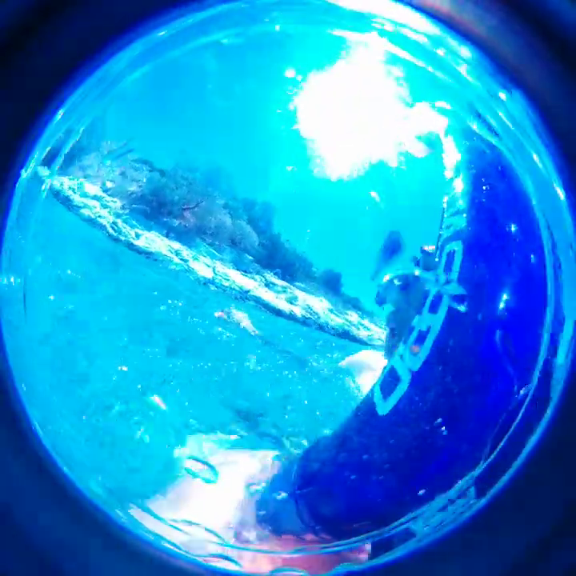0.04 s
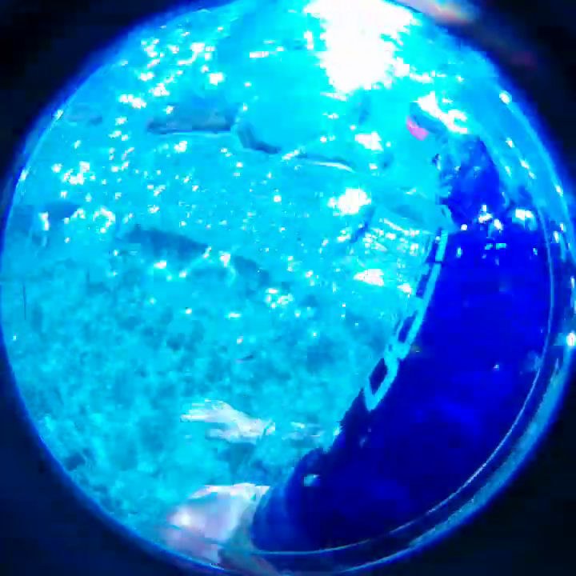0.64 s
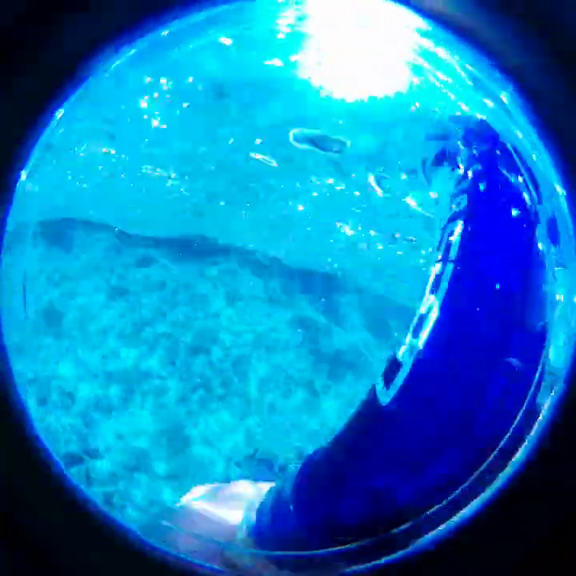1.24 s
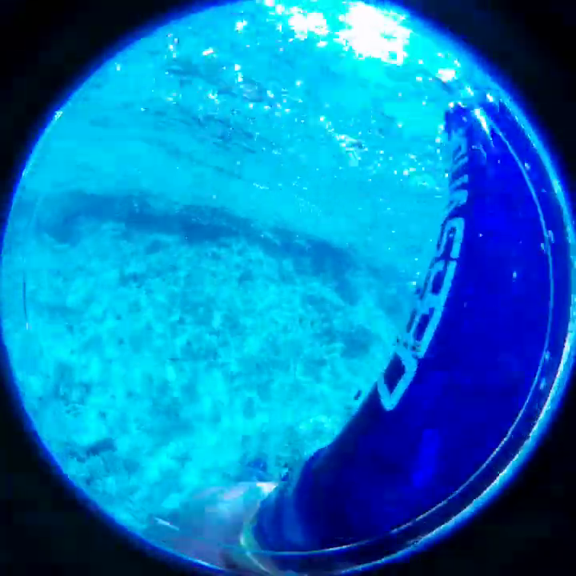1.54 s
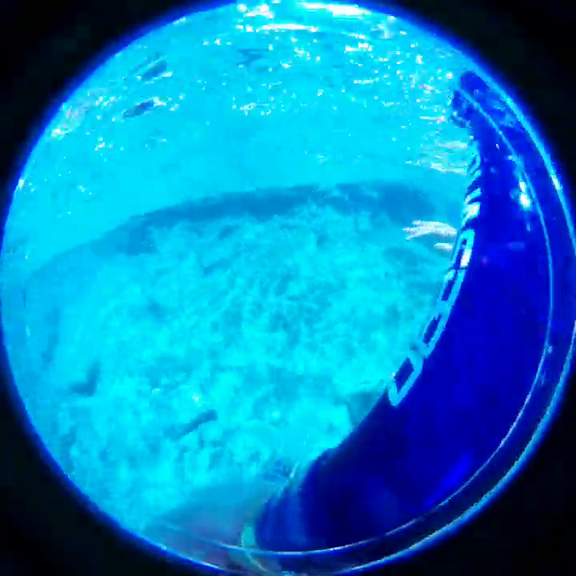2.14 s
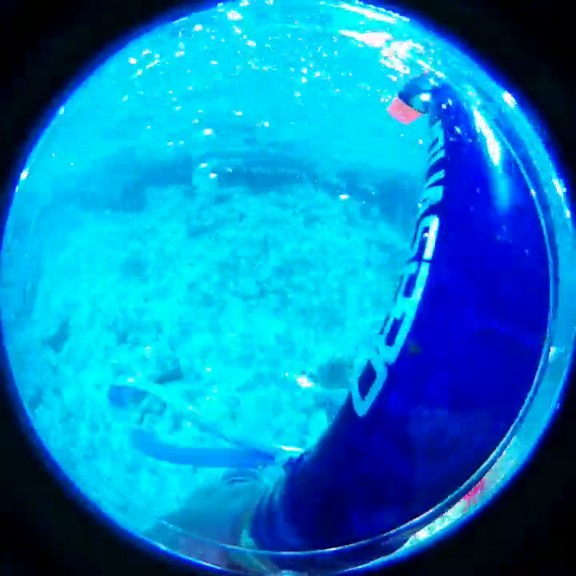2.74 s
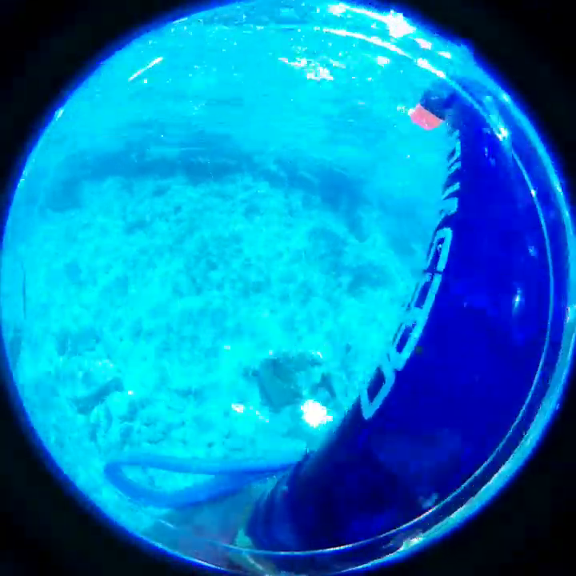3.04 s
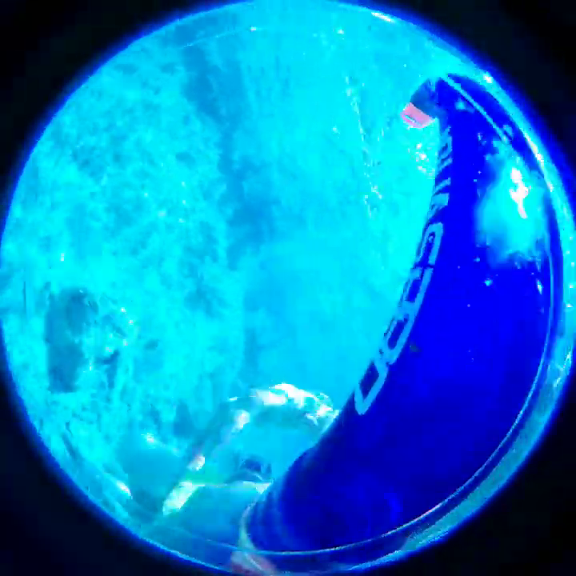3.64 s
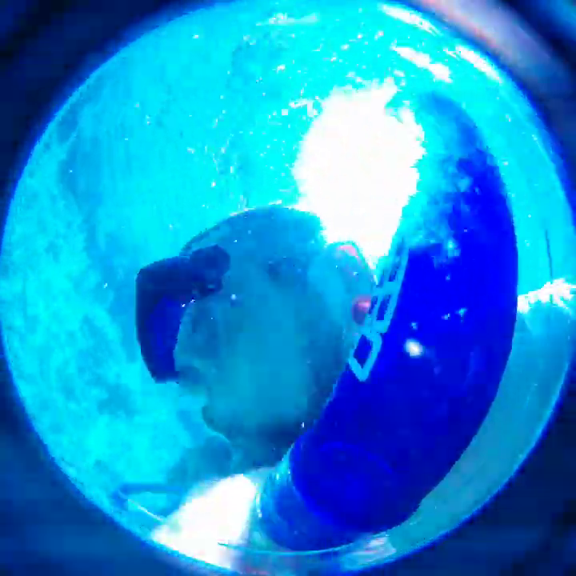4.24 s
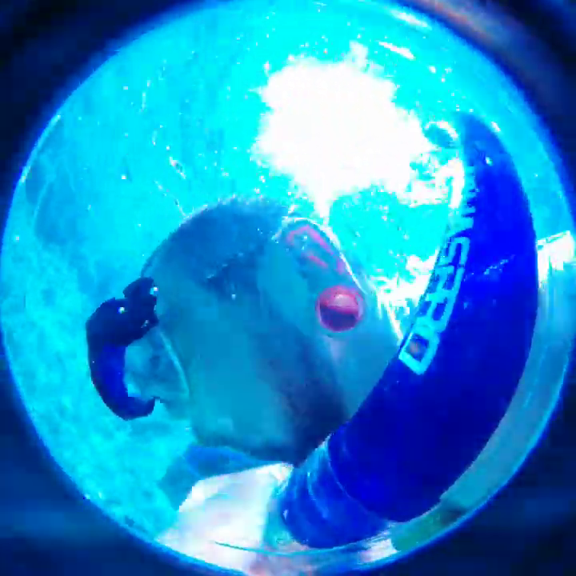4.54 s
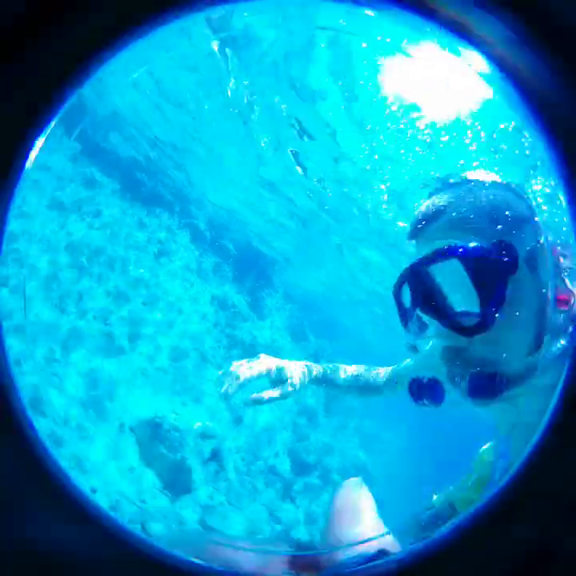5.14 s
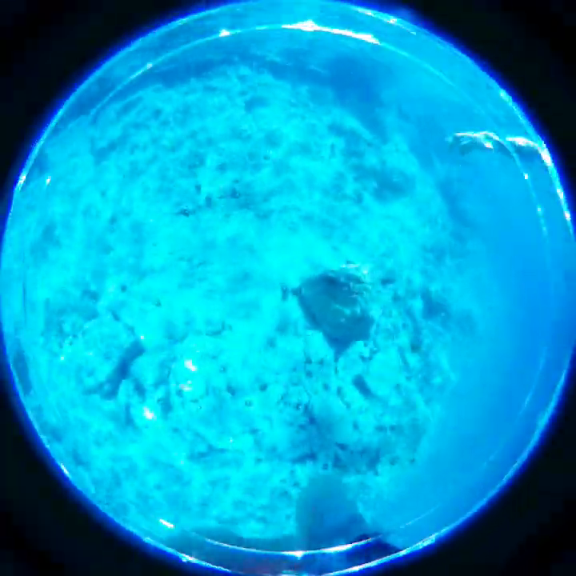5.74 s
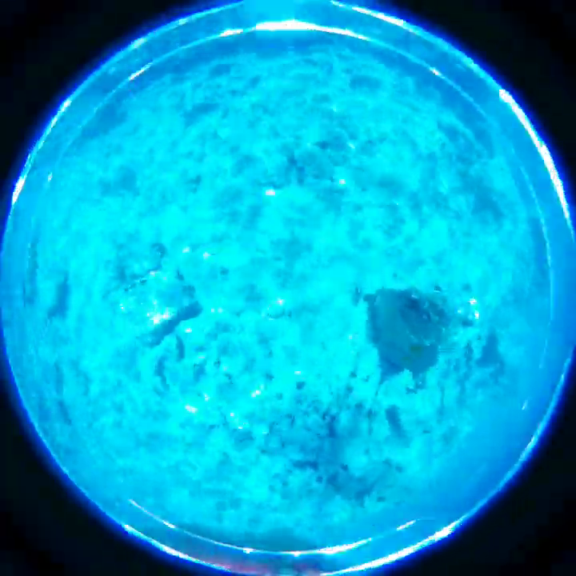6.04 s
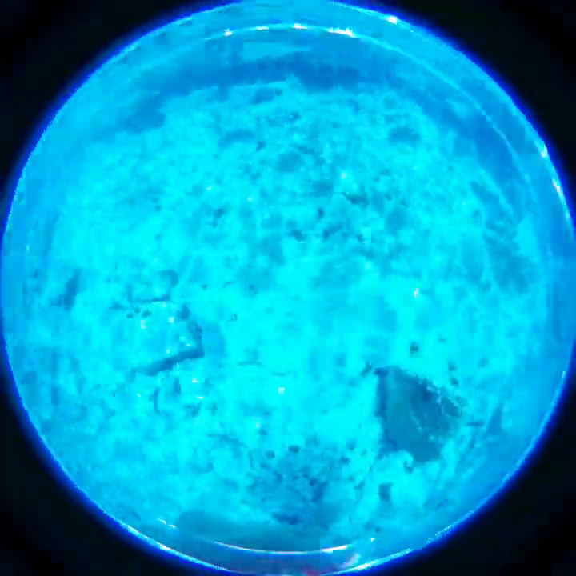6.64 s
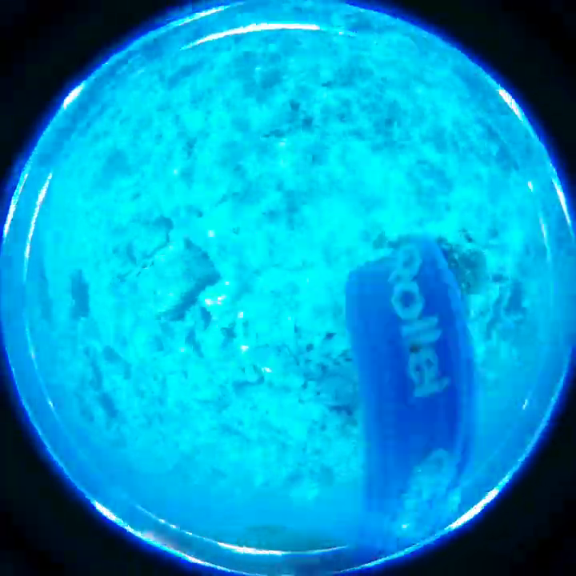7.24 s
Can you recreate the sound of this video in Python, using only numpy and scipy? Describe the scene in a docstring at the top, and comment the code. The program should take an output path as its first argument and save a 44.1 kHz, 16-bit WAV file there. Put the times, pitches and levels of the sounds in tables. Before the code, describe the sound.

Waves wash over a waterproof case with bubbly pops and dull thumps, before it dips under with a gulp and fading bubbling.

```python
"""At the sea surface, heard from inside a waterproof case that a snorkeller carries along, then dips under.
Waves wash over the case and slap it; trapped air rings as bubbles, thumps in pockets and bursts in spits,
over a bed of murmur and fizz. The plunge drags down a large air cavity that gulps, booms and breaks
into a churning cloud. The case shuts out the treble. At the peak of the plunge comes a sharp,
bright double click, like a brief overload."""
import sys
import numpy as np
from scipy import signal
from scipy.fft import rfft, irfft, next_fast_len
from scipy.io import wavfile
from scipy.ndimage import uniform_filter1d, minimum_filter1d, map_coordinates

SR = 44100
rng = np.random.default_rng(int(sys.argv[2]) if len(sys.argv) > 2 else 0)


def persist_wave(psi):
    """Save psi, clipped to +-1, as 16-bit WAV."""
    counts = np.round(np.clip(psi, -1, 1) * 32767).astype(np.int16)
    wavfile.write(sys.argv[1], SR, np.atleast_2d(counts).T)


N = 322371
T = np.arange(N) / SR
PLUNGE_S = 5.199  # the case is pulled under
PINCH_S = PLUNGE_S + 0.036  # the air cavity pinches off

# EQ curves for fine fizz, a dull knock on the case and bright spray: f/Hz, gain/dB
FIZZ_EQ = [(900, -24), (1700, 1), (2400, 4), (2850, -4.5), (3350, -1.5), (4200, -28)]
KNOCK_EQ = [(60, -7), (250, 12.5), (650, 4.5), (1200, -2), (1600, -16), (3500, -27), (5000, -72.5)]
SPRAY_EQ = [(300, -14), (1000, -1), (1900, 3.5), (2600, -1), (3300, -8), (3800, -3.5), (4600, -29)]


def amp(db):
    """Decibels to gain."""
    return 10 ** (np.asarray(db) / 20)


def unit(x):
    """Scale to rms 1."""
    return x / np.sqrt(np.mean(x ** 2) + 1e-20)


def at_peak(x, db):
    """Scale to a peak level."""
    return amp(db) * x / np.abs(x).max()


def add(track, s, sound):
    """Mix a sound into the track at s seconds."""
    part = track[max(round(s * SR), 0):][:len(sound)]
    part += sound[:len(part)]


def during(start, end, fade):
    """Gate: 1 inside a span, fading to 0 outside."""
    return np.clip(1 + np.minimum(T - start, end - T) / fade, 0, 1)


def swell(crest, db, rise, fall, hold=0):
    """Envelope that climbs to a crest, holds and falls away; rise and fall in dB/s."""
    return amp(db - rise * np.maximum(crest - T, 0) - fall * np.maximum(T - crest - hold, 0))


def after_plunge(db, fall):
    """Envelope that jumps up at the plunge and fades by fall dB/s."""
    return swell(PLUNGE_S, db, 4000, fall)


def together(gains):
    """Joint gain of unrelated sounds: their powers add."""
    return np.sqrt(sum(g ** 2 for g in gains))


def wobble(rate):
    """A smooth random curve, rate knots a second."""
    return map_coordinates(rng.standard_normal(int(N * rate / SR) + 4), [T * rate])


def eq(x, points):
    """Minimum-phase filter through points of f/Hz, gain/dB."""
    size = 2 * next_fast_len(len(x) // 2 + 2048)
    hz, db = np.transpose(points)
    gain = amp(np.interp(np.log(np.fft.rfftfreq(size, 1 / SR) + 1), np.log(hz), db))
    cepstrum = irfft(np.log(gain))
    cepstrum[1:size // 2] *= 2
    cepstrum[size // 2 + 1:] = 0
    return irfft(rfft(x, size) * np.exp(rfft(cepstrum)), size)[:len(x)]


def burst(t, t60):
    """White noise that dies by 60 dB in t60 seconds."""
    return rng.standard_normal(len(t)) * amp(-60 * t / t60)


def ring(t, hz, t60, rise=0):
    """A pulsating bubble: it starts within a cycle and drifts by rise * hz a second near the surface."""
    phase = 2 * np.pi * hz * t * (1 + rise * t / 2)
    return -np.sin(phase) * amp(-60 * t / t60) * (1 - np.exp(-2 * hz * t))


def cluster(count, hz, scatter, spacing, t60):
    """A few bubbles in quick succession, each weaker than the last; rms 1."""
    out, t = np.zeros(SR // 8), T[:SR // 8]
    for k, (detune, delay) in enumerate(rng.uniform(-0.82, 1, (count, 2))):
        pitch = hz * np.exp(scatter * detune * min(k + 1, 3))
        add(out, k * spacing * (1 + delay / 2), amp(-2.6 * k) * ring(t, pitch, t60, rise=1.6))
    return unit(out)


def swarm(start, end, colour, rate, band_hz, cycles, spread_db, noise_db):
    """Bubbles of random size, rate a second, in loud and soft clumps over noise; rms 1 in the span."""
    low_hz, high_hz = band_hz
    span = during(start, end, fade=0.006)
    pitch, length, strength, onset = np.hsplit(rng.random((int(rate * (end - start)), 4)), 4)
    hz = low_hz * (high_hz / low_hz) ** pitch
    life = cycles / hz * (0.5 + length)
    birth = np.minimum((start + (end - start) * onset) * SR, N - 1).astype(int)
    clump_db = 1.8 * wobble(35)[birth]
    gain = amp(clump_db - spread_db * np.log(np.maximum(strength, 0.04))) * hz / high_hz
    age = np.arange(int(cycles / low_hz * SR))
    rings = gain * ring(age / SR, hz, life, rise=0.23 / life)
    grains = np.bincount((birth + age).ravel(), rings.ravel(), N)[:N]
    mix = unit(grains) + amp(noise_db) * unit(span * rng.standard_normal(N))
    return unit(eq(mix, colour)) * np.sqrt(span.mean())


def patchy(x, depth_db):
    """Brief resonances come and go as the water changes shape."""
    spectrum = signal.stft(x, nperseg=512)[2]
    field = uniform_filter1d(rng.standard_normal(spectrum.shape), size=3, axis=0)
    field = unit(uniform_filter1d(field, size=7, axis=1))
    return signal.istft(spectrum * amp(depth_db * (field - 0.08 * depth_db)), nperseg=512)[1][:N]


def scattered(x):
    """The surface and nearby bubbles throw back a very short diffuse tail."""
    t = T[:SR // 10]
    tail = burst(t, t60=0.048) * (1 - np.exp(-t / 0.026))
    return x + amp(-11.5) * signal.fftconvolve(x, tail / np.linalg.norm(tail))[:N]


def hollowed(x):
    """The case walls cancel narrow bands of the underwater sound."""
    # notches: f/Hz, width/Hz, depth/dB
    notches = [(1046, 42, 11.5), (1620, 150, 1), (2170, 180, 7), (2640, 74, 2.5)]
    hz = np.arange(1, 4000, 10)
    cut_db = sum(db * np.exp(-((hz - centre) / width) ** 2) for centre, width, db in notches)
    return eq(x, np.c_[hz, -cut_db])


def sway():
    """Slow pressure on the moving case makes a wavering sub rumble."""
    # rumble EQ: f/Hz, gain/dB
    rumble_eq = [(10, 2), (22, -1.5), (50, -8), (90, -19.5), (200, -28), (400, -53)]
    # fader ride: t/s, relative level/dB
    ride = [(0.0, -39.5), (0.2, -41.5), (0.83, -49.5), (3.5, -37.5), (3.73, -35), (4.48, -43), (4.8, -32.5),
            (5.05, -37), (7.25, -37.5)]
    rumble = unit(eq(rng.standard_normal(N), rumble_eq))
    return rumble * amp(np.interp(T, *np.transpose(ride)) + 2 + 0.92 * wobble(28))


def sea():
    """A bed of far bubbles murmuring and fizzing; swirls and the plunge stir it up."""
    # murmur EQ: f/Hz, gain/dB
    murmur_eq = [(90, -5.5), (250, 4), (450, 0), (700, 1), (1020, -1), (1160, 0), (1550, -19), (2200, -28),
                 (3500, -49.5)]
    # swirls of bubbly water passing the case: t/s, murmur level/dB, fizz level/dB
    swirls = [(3.161, -34.5, -53.5), (3.64, -38.5, -59), (3.85, -47, -60.5), (4.919, -40.5, -54),
              (5.111, -36, -68.5), (5.879, -30.5, -65), (6.131, -34.5, -47), (7.249, -30.5, -42.5)]
    calm_murmur, calm_fizz = amp(-49.5), amp(-61.5)
    murmur_swells = [swell(s, db, rise=145.5, fall=135.5) for s, db, _ in swirls]
    fizz_swells = [swell(s, db, rise=145.5, fall=135.5) for s, _, db in swirls]
    # the finest bubbles linger after the plunge
    murmur_gain = together([calm_murmur, after_plunge(-31, fall=7.5)] + murmur_swells)
    fizz_gain = together([calm_fizz, after_plunge(-51, fall=7.5)] + fizz_swells)
    # stray plips give way to an even rush once the water is full of air
    stray = swarm(0, PLUNGE_S, murmur_eq, 300, (450, 1300), cycles=22, spread_db=3, noise_db=1)
    dense = swarm(PLUNGE_S, T[-1], murmur_eq, 1200, (400, 1500), cycles=26, spread_db=2.5, noise_db=4)
    fizz = swarm(0, T[-1], FIZZ_EQ, 250, (1600, 3800), cycles=30, spread_db=1.5, noise_db=10)
    return murmur_gain * (stray + dense) + fizz_gain * fizz


def gurgles():
    """Soft, separate strings of bubbles a little way off."""
    # gurgle cues: t/s, peak level/dB, f/Hz
    cues = [(2.848, -27.5, 1020), (3.27, -30, 987), (3.458, -28.5, 880), (3.49, -31.5, 605),
            (3.508, -25, 633), (4.118, -32.5, 965), (4.198, -28.5, 964), (4.335, -32, 690),
            (4.577, -34, 673), (6.14, -23, 740)]
    out = np.zeros(N)
    for s, db, hz in cues:
        add(out, s, at_peak(cluster(3, hz, scatter=0.11, spacing=0.004, t60=0.018), db))
    return out


def wash():
    """At the surface a fizzing sheet of water runs over the case; its resonances sink as it drains."""
    # EQ of the sheet: f/Hz, gain/dB
    sheet_eq = [(60, -4), (120, -1), (240, -13), (420, 6), (540, -5.5), (760, 1.5), (930, -10), (1060, 3),
                (1270, -6.5), (1600, -6.5), (1860, -4), (2000, -13.5), (2330, -5), (2780, -13),
                (3280, -11.5), (3650, -20.5), (4400, -29.5)]
    # waves over the case: crest t/s, hold/s, level/dB
    waves = [(0.02, 0.077, -31), (0.263, 0.083, -30), (0.489, 0.15, -33), (0.809, 0.028, -45.5),
             (0.933, 0.041, -42.5), (1.154, 0.011, -31), (2.018, 0.19, -30.5), (2.571, 0.016, -39.5)]
    drain_start_s, drain_end_s, wash_end_s = 1.92, 2.33, 2.72
    ripple = amp(1.4 * wobble(25) + 1.2 * wobble(110))
    flow = ripple * together(swell(s, db, rise=69.5, fall=56, hold=hold) for s, hold, db in waves)
    sheet = swarm(0, wash_end_s, sheet_eq, 1800, (700, 4000), cycles=24, spread_db=2.5, noise_db=4)
    # a thin film drains off: two noise bands ride one falling glide
    glide_hz = 998 + (1930 - 998) * np.exp(-np.maximum(T - drain_start_s, 0) / 0.083)
    phase = 2 * np.pi * np.cumsum(glide_hz) / SR
    low, high = [wobble(width_hz) * np.sin(ratio * phase) + wobble(width_hz) * np.cos(ratio * phase)
                 for ratio, width_hz in [(0.93, 340), (1.4, 900)]]
    film = unit(low + amp(-3) * high)
    draining = 0.76 * during(drain_start_s, drain_end_s, fade=0.047)
    # as the sheet thins, its smallest bubbles ring on
    foam = swarm(0.7, 1.09, FIZZ_EQ, 400, (2100, 2700), cycles=50, spread_db=1.5, noise_db=-6)
    return flow * ((1 - 0.64 * draining) * patchy(sheet, depth_db=4) + draining * film + amp(1) * foam)


def spits():
    """Tiny bubbles burst on the case, each a dry snap and a very short ring."""
    # spit cues: t/s, peak level/dB, f/Hz
    cues = [(0.2586, -18.5, 3300), (0.2807, -17.5, 3420), (0.355, -16.5, 1235), (0.4225, -9.5, 1073),
            (0.4238, -7.5, 3340), (0.4289, -7, 2030), (0.5162, -17.5, 1460), (1.0934, -6, 927),
            (1.107, -7, 3300), (1.132, -12.5, 3250), (1.154, -17.5, 3370), (1.164, -14.5, 1230),
            (1.202, -10.5, 3250), (1.274, -11, 3510), (1.32, -20.5, 766), (1.3239, -10, 3350),
            (1.4394, -12.5, 3420), (2.059, -22, 3280), (2.3181, -20.5, 1310), (2.409, -29, 3360),
            (2.463, -13.5, 1020), (2.474, -15.5, 1700), (2.53, -17.5, 2180), (2.5437, -15.5, 1075),
            (2.546, -21.5, 3150), (2.568, -28.5, 3320), (2.5974, -13, 1205), (2.613, -26.5, 3160),
            (2.628, -24.5, 3180), (2.746, -24, 1235), (.773, -23, 3260), (2.996, -31, 2580),
            (3.053, -28, 1800), (3.094, -33, 3440), (3.821, -31.5, 2040), (3.836, -30, 1930),
            (3.901, -33, 2010), (4.258, -34.5, 1980), (4.507, -40, 2430), (4.846, -22.5, 1900),
            (5.8587, -11.5, 1850), (5.8602, -11.5, 3440), (5.9393, -20.5, 1920)]
    out, t = np.zeros(N), T[:SR // 8]
    for s, db, hz in cues:
        snap = unit(eq(burst(t, t60=0.02), SPRAY_EQ))
        ping = unit(ring(t, hz, t60=42 / hz))
        add(out, s, at_peak(ping + amp(-3) * snap, db))
    return out


def slaps():
    """Water slaps the case: a soft splat with a cluster of bubbles and a spray of tiny ones."""
    # slap cues: t/s, peak level/dB, f/Hz, spray trim/dB
    cues = [(.283, -17.5, 840, -7), (1.098, -5, 980, -3.5), (1.32, -10, 902, -7),
            (1.555, -27.5, 1370, -17.5), (2.068, -14.5, 990, -9), (2.907, -26.5, 834, -21),
            (3.053, -25, 750, -29), (3.1972, -9, 667, -27), (3.601, -28, 810, -11.5),
            (3.815, -27, 745, -41), (3.933, -30.5, 705, -28), (4.426, -26, 985, -48),
            (4.845, -20, 735, -30), (4.907, -30, 920, -27), (5.009, -30, 1060, -16), (5.063, -26, 774, -32),
            (5.082, -13.5, 672, -48), (5.192, -17, 1182, -22.5), (5.462, -18, 614, -25),
            (5.686, -16.5, 850, -44), (5.965, -13, 590, -21.5), (6.111, -23.5, 810, -23),
            (6.187, -23, 803, -43), (7.203, -21, 997, -41), (7.243, -20, 1175, -18.5)]
    out, t = np.zeros(N), T[:SR // 8]
    for s, db, hz, spray_db in cues:
        splat = burst(t, t60=0.022) * (1 - np.exp(-t / 0.0067))
        body = cluster(8, hz, scatter=0.16, spacing=0.0028, t60=0.033)
        body += amp(-12) * unit(eq(splat, KNOCK_EQ))
        spray = cluster(5, 3000, scatter=0.1, spacing=0.0048, t60=0.0054)
        spray += amp(7.5) * unit(eq(splat, SPRAY_EQ))
        add(out, s, at_peak(body + amp(spray_db + 2) * spray, db))
    return out


def pockets():
    """Large air pockets knock the case and thump, dying within a few cycles as their pitch climbs."""
    # pocket cues: t/s, level/dB, f/Hz, knock relative to thump/dB
    cues = [(0.234, -11.5, 56, -7.5), (0.258, -5.5, 91.5, -22), (0.558, -13.5, 55.2, -19),
            (1.437, -13.5, 150, -6.5), (1.699, -1, 140.4, -8.5), (1.762, -16.5, 173, -2.5),
            (1.9749, -13, 116.3, -2.5), (2.513, 5.5, 139, -10), (2.961, -5, 109, -12.5),
            (3.129, 2, 135, -18), (3.208, 0.5, 128, -10.5), (3.405, -11.5, 70.2, -25), (3.573, 4, 147, -15),
            (4.233, -31, 231, -10.5), (4.427, -16, 289, -2.5), (5.366, -5.5, 83.5, -16.5),
            (5.473, -12, 119, -11), (7.256, -17, 150, -8.5)]
    out, t = np.zeros(N), T[:SR // 6]
    for s, db, hz, knock_db in cues:
        knock = at_peak(eq(burst(t, t60=0.019), KNOCK_EQ), knock_db)
        thump = ring(t, hz, t60=2.86 / hz, rise=7.8)
        add(out, s, amp(db) * (thump + knock))
    return out


def bubbles():
    """Air pinched off right beside the case rings loudly and gives the water a short push."""
    # close bubbles: t/s, level/dB, f/Hz, t60/s, relative pitch rise/(1/s)
    cues = [(1.0922, -1, 3730, 0.011, 0), (1.0978, 5.5, 1486, 0.029, -2), (1.1232, -7.5, 3100, 0.015, -1),
            (1.197, 14, 933, 0.016, -9), (1.1975, -5, 3070, 0.018, 0), (1.2138, -3, 401.5, 0.11, 1.5),
            (1.2732, -11, 733, 0.082, 0.5), (1.2754, -5, 1490, 0.019, 3), (1.3238, -0.5, 930, 0.017, 9),
            (1.3302, 9.5, 696, 0.021, -4.5), (1.3527, 6, 649, .015, -9), (1.3532, -10.5, 1610, 0.022, 2),
            (1.4385, 0, 471, 0.045, 0.5), (2.3278, -3.5, 443, 0.091, 2.5), (2.386, -12, 540, 0.013, -7),
            (2.432, -26, 478, 0.33, 5), (2.4, -15.5, 2030, 0.023, -3), (2.4625, -2.5, 990, 0.025, 5.5),
            (2.4745, -14, 725, 0.083, 5.5), (2.514, -11.5, 900, 0.039, 19.5), (2.833, -24.5, 714, 0.095, 3),
            (3.054, -19, 108, 0.22, 15), (3.055, -22.5, 253, 0.17, 8), (3.1244, -12.5, 624, 0.094, -4),
            (3.209, -12.5, 550, 0.089, -0.5), (3.2109, -6.5, 1075, .024, -16),
            (3.229, -27.5, 279.6, 0.23, 14.5), (3.63, -16, 778, 0.031, -6), (4.2385, -10.5, 780, 0.014, -5),
            (4.2595, -15, 713, 0.018, -1), (4.506, -28, 1146, 0.14, -4.5), (5.1989, 2, 546, 0.023, -1),
            (5.243, -9.5, 698, 0.14, 2), (5.37, -12, 732, 0.056, 1.5), (5.399, -10.5, 252, 0.071, 3.5),
            (5.438, -16.5, 339, .07, -2), (5.516, -8.5, 1110, 0.052, -2), (5.5398, -5.5, 690, 0.052, 10.5),
            (5.966, -17.5, 405, 0.065, -6.5), (6.783, -20, 683, 0.059, 1.5),
            (7.299, -14.5, 713, .084, -0.5)]
    out, t = np.zeros(N), T[:SR // 4]
    push = -t / 0.002 * np.exp(-t / 0.00031)
    for s, db, hz, t60, rise in cues:
        add(out, s, amp(db) * (ring(t, hz, t60, rise) + amp(3.5) * push))
    return out


def glug():
    """A bubble squeezed as it pinches off holds its level and rises in pitch: one slightly rough glug."""
    start_s, hz, rise_hz_per_s = 1.4525, 600, 12000
    t = np.maximum(T - start_s, 0)
    tone = np.sin(2 * np.pi * t * (hz + rise_hz_per_s * t / 2) + 0.25 * wobble(250))
    return tone * swell(start_s, -11, rise=9000, fall=2294, hold=0.017)


def slams():
    """The cavity wall beats on the case in a short rattle of five equally strong hits."""
    out, t = np.zeros(N), T[:SR // 20]
    for k in range(5):
        hz = 950 * np.exp(0.06 * rng.standard_normal())
        add(out, PLUNGE_S + k * 0.0089, amp(-1.5) * ring(t, hz, t60=0.0078))
    return out


def double_click():
    """A sharp, bright double click at the peak of the plunge, like a brief overload."""
    out, t = np.zeros(N), T[:SR // 50]
    for s in (PINCH_S, PINCH_S + 0.0042):
        click = eq(burst(t, t60=0.004), [(4500, -1), (7000, -13.5), (15000, -31)])
        add(out, s, at_peak(click, -29.5))
    return out


def cavity():
    """The plunge drags down an air cavity that gulps lower as it grows and booms as it pinches off."""
    start_hz, end_hz, sink_s, life_s, boom_hz = 440, 61.1, 0.063, 0.26, 182
    hz = end_hz + (start_hz - end_hz) * np.exp(-np.maximum(T - PLUNGE_S, 0) / sink_s)
    envelope = after_plunge(-20.5, fall=12.5) * during(PLUNGE_S, PLUNGE_S + life_s, fade=0.0058)
    gulp = envelope * amp(1.1 * wobble(51)) * np.sin(2 * np.pi * np.cumsum(hz) / SR)
    boom = swell(PINCH_S, -8, rise=751, fall=751) * np.sin(2 * np.pi * boom_hz * T)
    return gulp + boom


def cloud():
    """The cavity breaks into bubbles: large ones rise away first, small ones churn in surges."""
    # EQ of the large and of the small bubbles: f/Hz, gain/dB
    large_eq = [(40, -27.5), (80, 3), (170, -1.5), (330, -5.5), (500, -42)]
    small_eq = [(200, 7.5), (450, -10.5), (750, -0.5), (950, -7), (1150, -9.5), (1550, -25), (1870, -10),
                (3300, -30.5), (4200, -71.5)]
    # surges of churning: crest t/s, hold/s, level/dB
    churns = [(5.188, 0.02, -13), (5.426, 0.026, -24), (5.711, 0.044, -23)]
    end_s = PLUNGE_S + 0.9
    large = swarm(PINCH_S, end_s, large_eq, 120, (70, 350), cycles=11, spread_db=1, noise_db=-7)
    small = swarm(PLUNGE_S, end_s, small_eq, 600, (330, 1500), cycles=30, spread_db=1.5, noise_db=-8)
    surges = [swell(s, db, rise=699, fall=245, hold=hold) for s, hold, db in churns]
    small_gain = together(surges + [after_plunge(-19.5, fall=23)])
    return after_plunge(-18.5, fall=26.5) * large + small_gain * small


def scene():
    """Close hits, surface wash and the deep layer, muffled by the case; the double click stays bright."""
    # what the case lets through: f/Hz, gain/dB
    case_eq = [(3, -13), (20, 6), (3500, -2.5), (3900, -16), (4400, -18.5), (5200, -47.5), (8000, -77.5)]
    near = scattered(bubbles() + glug() + pockets() + slaps() + spits()) + slams()
    deep = hollowed(sway() + sea() + scattered(gurgles()) + cavity() + cloud())
    return (eq(near + wash() + deep, case_eq) + double_click())[None]


def record(dry):
    """A fast limiter of limited range rounds off the peaks, the hardest saturate; a low-pass follows."""
    ceiling, hardness, hold, least_gain, top_hz = 0.72, 24, SR // 200, 0.55, 15500
    needed = np.clip(0.92 * ceiling / (np.abs(dry) + 1e-9), least_gain, 1)
    limited = dry * uniform_filter1d(minimum_filter1d(needed, hold), hold)
    saturated = limited / (1 + np.abs(limited / ceiling) ** hardness) ** (1 / hardness)
    return signal.sosfilt(signal.butter(12, top_hz, fs=SR, output="sos"), saturated)


dry = scene()
out = record(dry)
persist_wave(out)
```